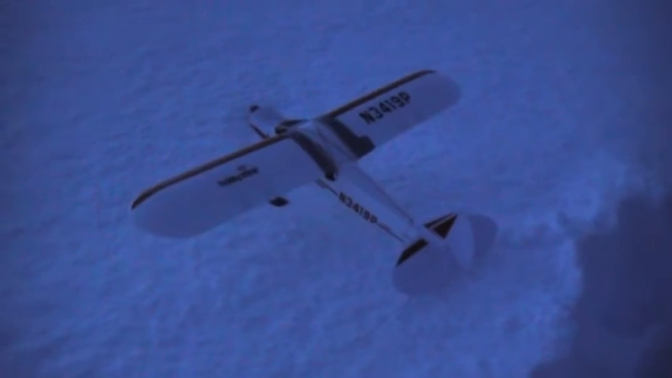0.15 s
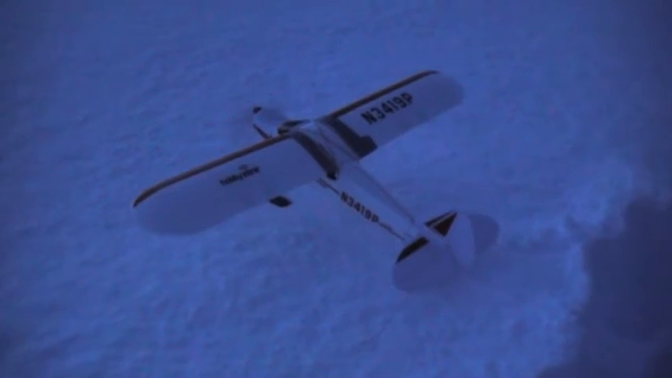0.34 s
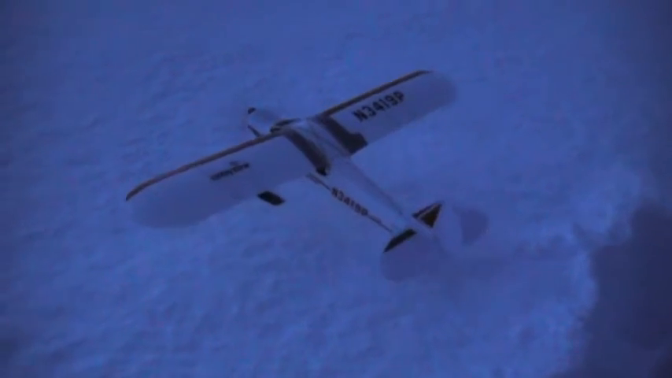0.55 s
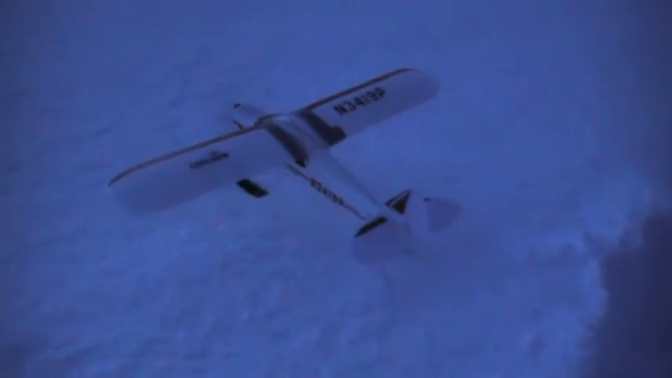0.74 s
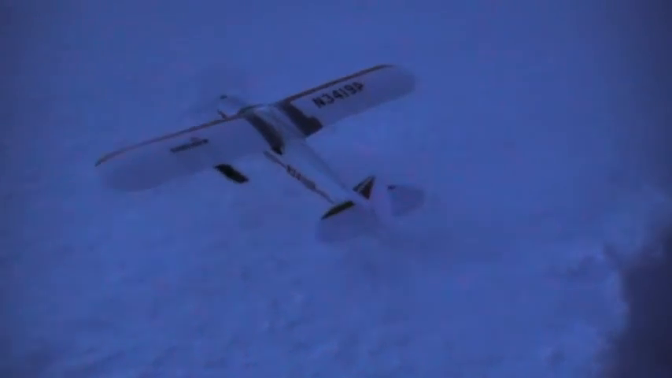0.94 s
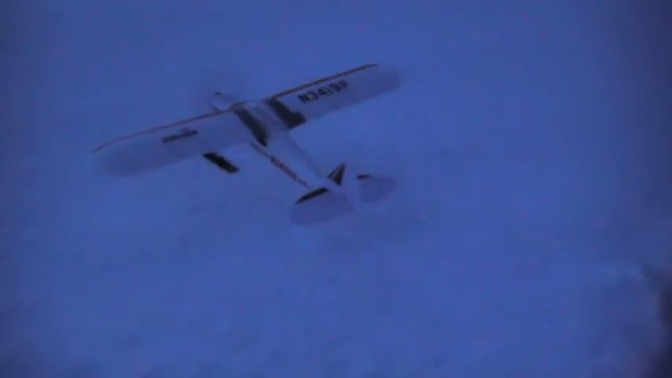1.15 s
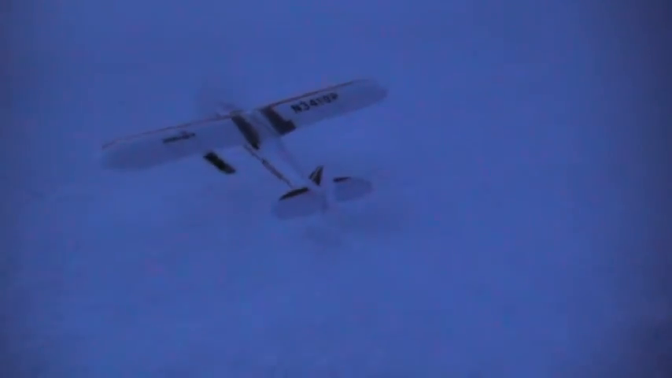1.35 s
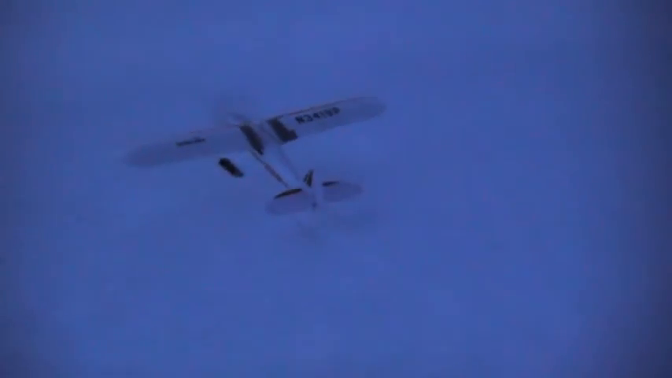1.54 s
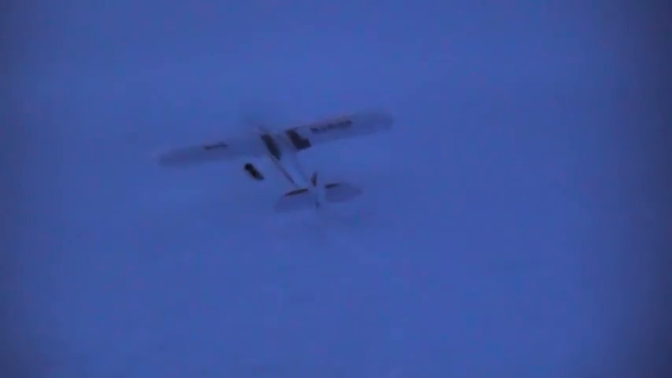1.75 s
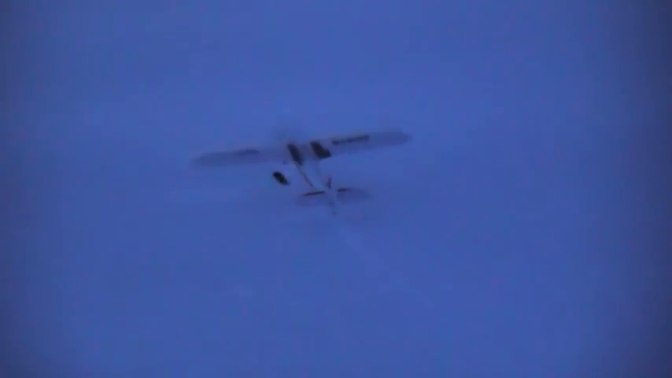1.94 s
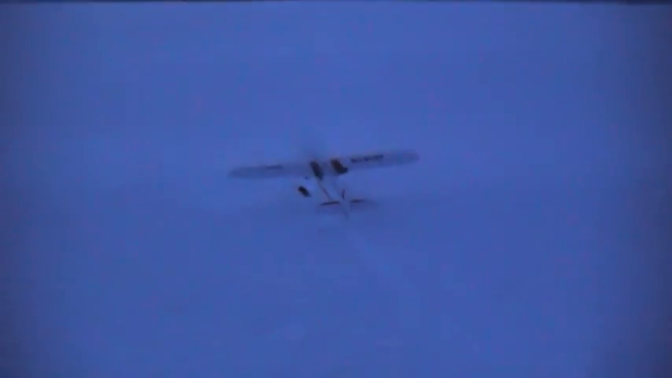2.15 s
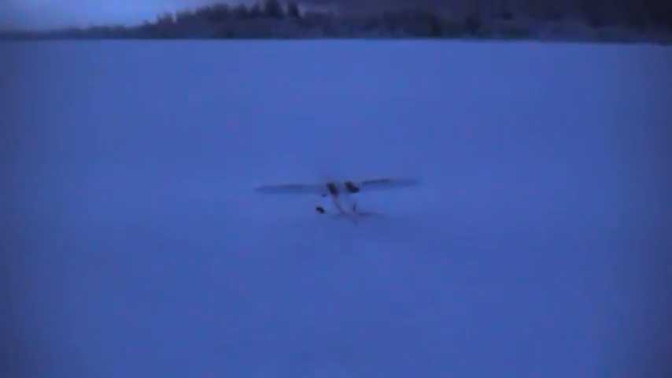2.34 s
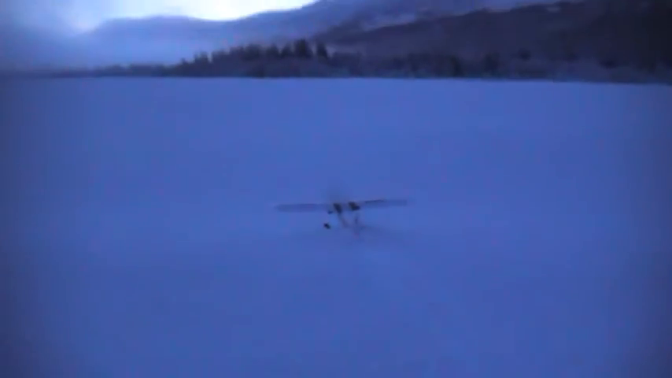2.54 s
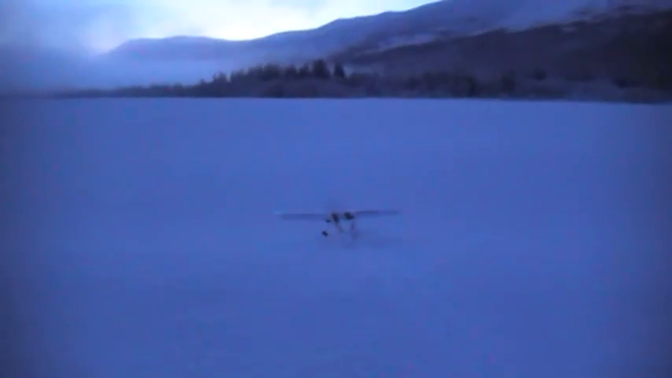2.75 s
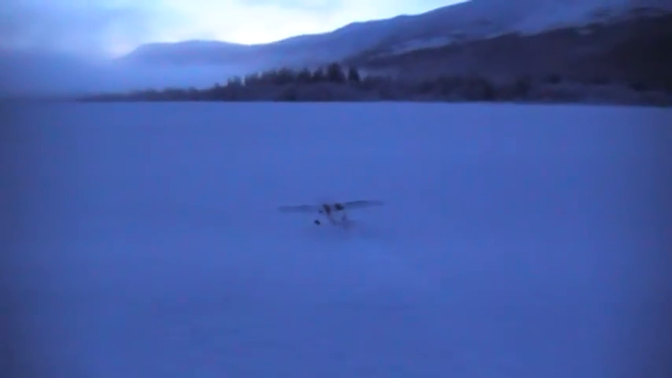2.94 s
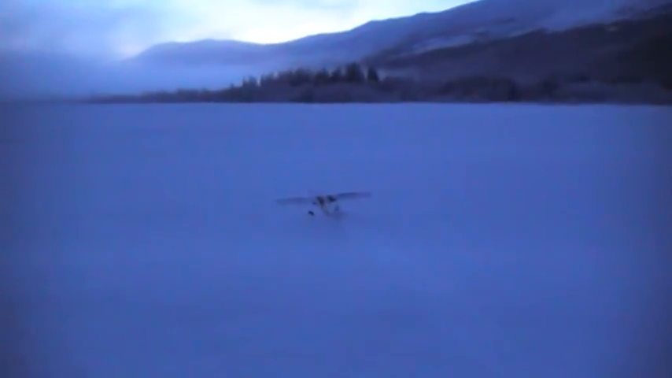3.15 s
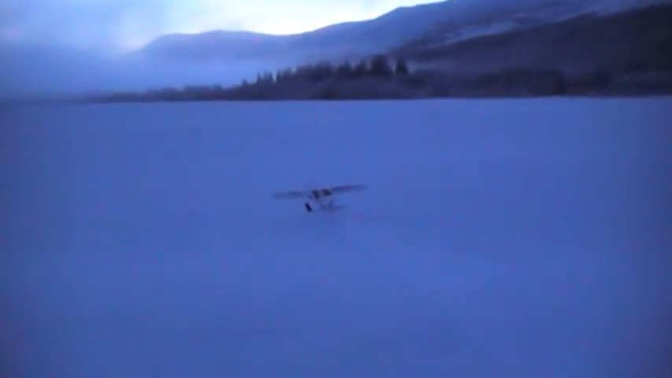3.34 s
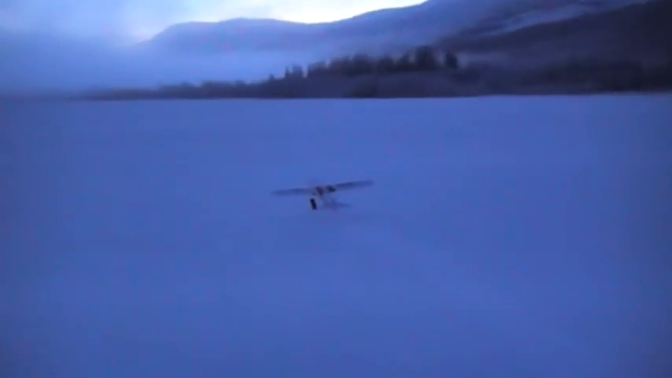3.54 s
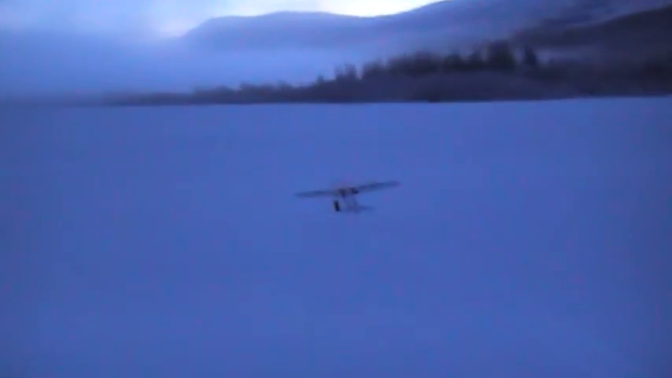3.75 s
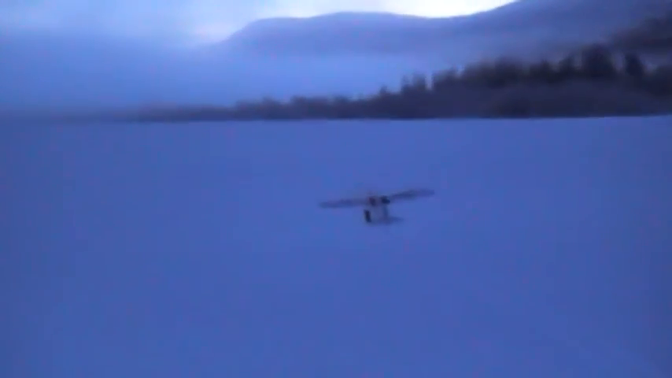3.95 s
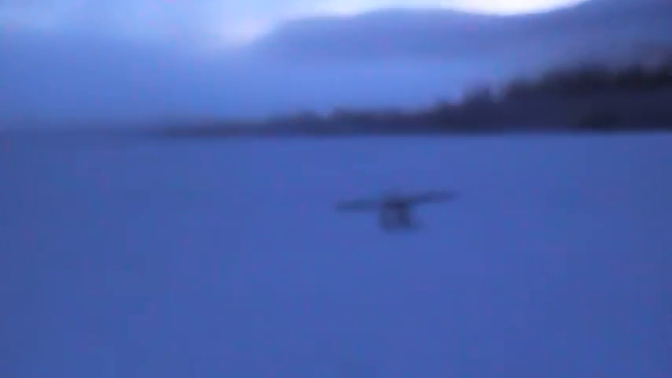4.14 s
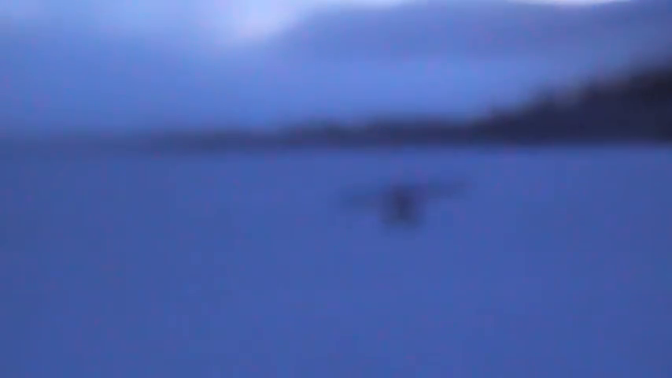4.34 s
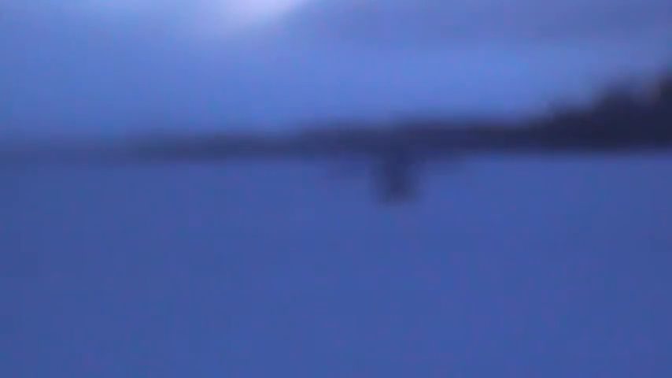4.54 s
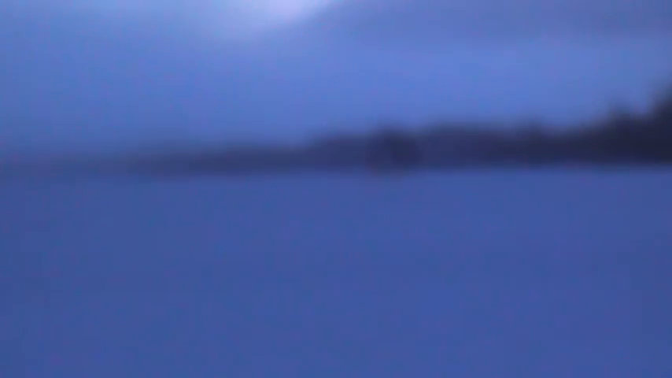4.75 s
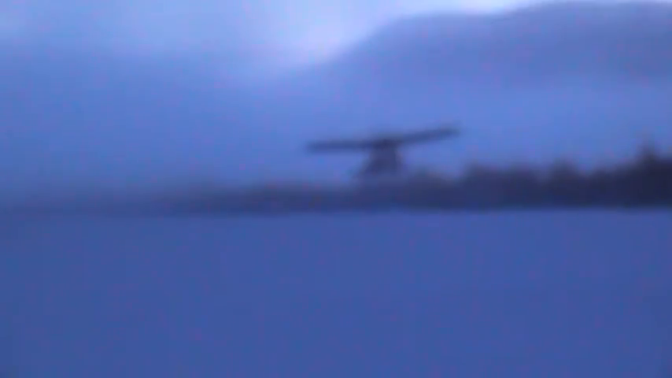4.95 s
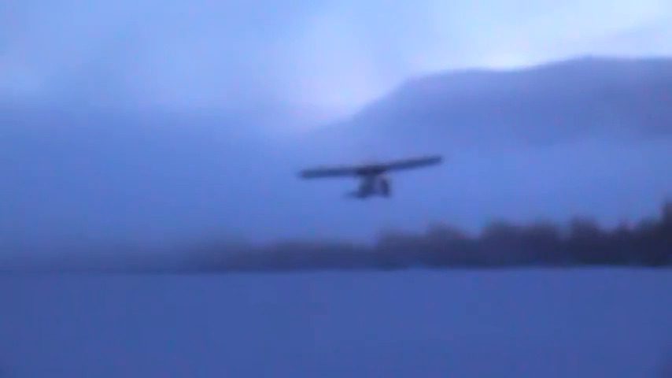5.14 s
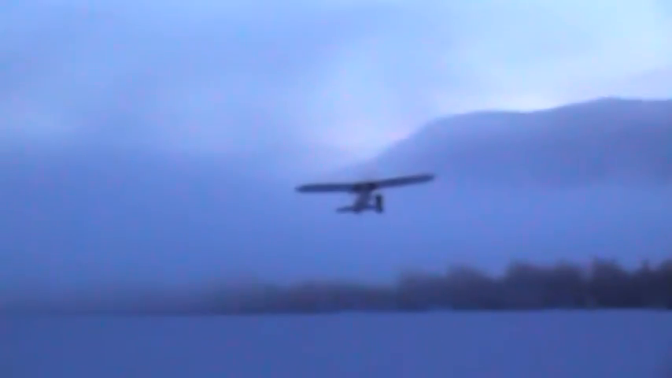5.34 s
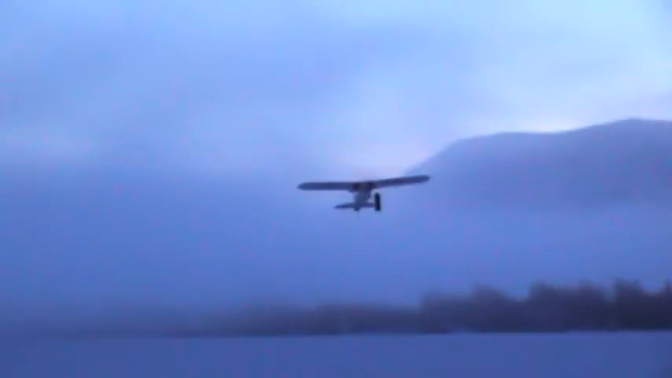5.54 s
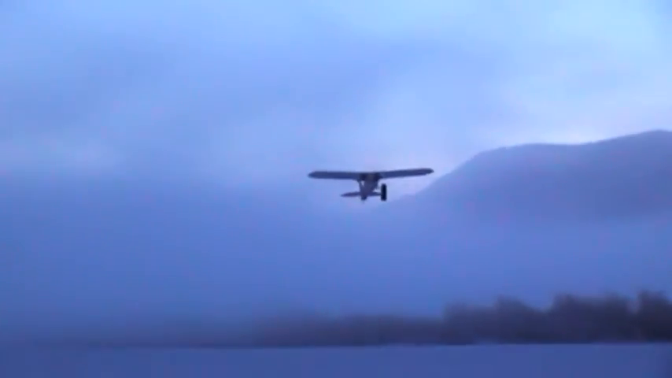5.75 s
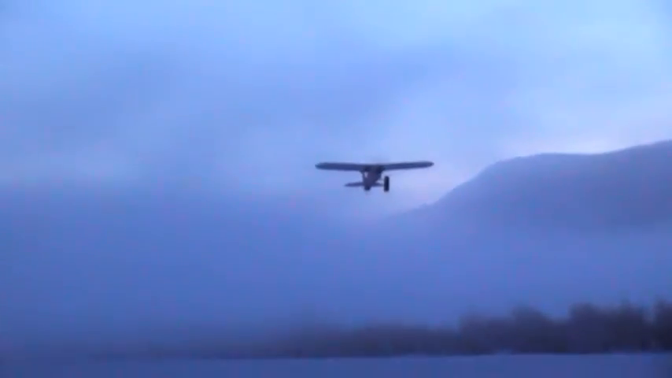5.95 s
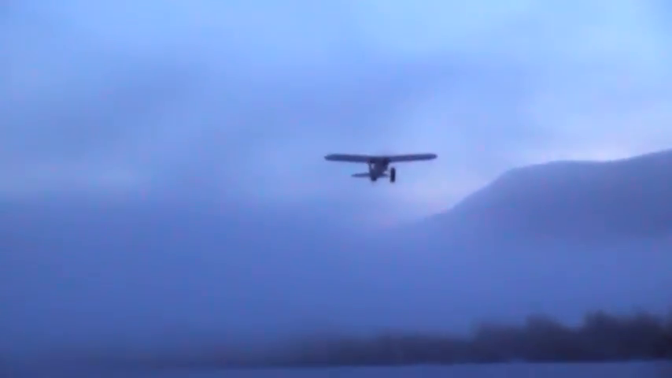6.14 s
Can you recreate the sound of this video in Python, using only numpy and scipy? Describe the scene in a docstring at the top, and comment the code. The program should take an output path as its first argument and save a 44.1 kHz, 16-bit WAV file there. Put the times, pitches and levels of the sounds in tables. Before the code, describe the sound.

A small geared electric model plane chatters and spins up close by, then buzzes and whines away over snow and lifts off, fading.

```python
"""A small geared electric model plane spins up beside the camera, its slack gear chattering and clacking.
It then slides away over snow: a 36-tooth gear whines and buzzes in a pattern that repeats every propeller
turn, built from lines locked to the shaft, over the hum and churned air of two blades.
From the middle on, a hand knocks on the camera (short noise bursts ringing its shell). The plane lifts off,
and as it climbs a delayed, inverted echo from the snow sweeps notches down through the gear sound."""
import sys
import numpy as np
from scipy import signal
from scipy.fft import rfft, irfft, next_fast_len
from scipy.io import wavfile
from scipy.ndimage import uniform_filter1d, map_coordinates

SR = 44100
rng = np.random.default_rng(int(sys.argv[2]) if len(sys.argv) > 2 else 0)


def persist_wave(psi):
    """Save psi, clipped to +-1, as 16-bit WAV."""
    counts = np.round(np.clip(psi, -1, 1) * 32767).astype(np.int16)
    wavfile.write(sys.argv[1], SR, np.atleast_2d(counts).T)


N = 277389
PADDED = next_fast_len(N + SR // 4)
TIME, FREQ = np.arange(N) / SR, np.fft.rfftfreq(PADDED, 1 / SR)


def undb(db):
    """Decibels to gain."""
    return 10 ** (np.asarray(db) / 20)


def unit(x):
    """Scale to rms 1."""
    return x / np.sqrt(np.mean(x ** 2))


def curves(table):
    """Each column of a table against its first column in seconds, joined by straight lines."""
    seconds, *columns = np.transpose(table)
    return [np.interp(TIME, seconds, column) for column in columns]


def over_freq(points):
    """Points joined on a log-frequency axis."""
    hz, value = np.transpose(points)
    return np.interp(np.log(FREQ + 1), np.log(hz + 1), value)


def filtered(x, response):
    """Apply a frequency response."""
    return irfft(rfft(x, PADDED) * response, PADDED)[..., :N]


def noise():
    """Plain white noise."""
    return rng.standard_normal(N)


def resonances(modes):
    """Response of a few damped modes, each a peak with its own width and level."""
    response = 0
    for hz, width, db in modes:
        damping = 1j * FREQ * width
        response = response + undb(db) * damping / (hz ** 2 - FREQ ** 2 + damping)
    return response


def walk(rate_hz):
    """Slow random wandering with spread 1."""
    return unit(filtered(noise(), np.exp(-(FREQ / rate_hz) ** 2)))


def ease(middle_s, spread_s):
    """A smooth step from 0 to 1."""
    return .5 + .5 * np.tanh((TIME - middle_s) / (2 * spread_s))


def tones(turns, table, waver_db):
    """Sines locked to the shaft, each free to waver a little in level."""
    total = 0
    for multiple, db in table:
        level = np.sqrt(2) * undb(db + waver_db * walk(0.91))
        total = total + level * np.sin(2 * np.pi * (round(multiple) * turns + rng.random()))
    return total


# Spectrum of still air and microphone hiss. Each row: frequency in Hz, relative density in dB per Hz.
AIR_SPECTRUM = [(25, -22), (60, -2), (200, -0.5), (500, 3.5), (1000, 5), (2500, -3.5), (5000, -5),
                (9000, 2), (15000, -36)]


def air(level_db=-52.5, side_db=-16, waver_db=0.22):
    """A faint, nearly centred hush: shaped noise with a weaker left-right difference."""
    mid, side = unit(filtered(rng.standard_normal((2, N)), undb(over_freq(AIR_SPECTRUM))))
    stereo = mid + undb(side_db) * side * np.array([[1], [-1]])
    return undb(level_db + waver_db * walk(5.8)) * stereo


# Modes of the camera shell. Each row: frequency in Hz, width in Hz, relative level in dB.
SHELL_MODES = [(306, 240, 4), (694, 340, -11), (980, 530, 8)]
# Knocks of the hand. Each row: start in seconds, peak in dB before the knock trim,
# low thud against the shell modes in dB before the thud trim.
HAND_KNOCKS = [(2.58, -18, -21), (2.594, -23.5, -17), (2.64, -25.5, -14), (2.673, -31, -8),
               (2.752, -25.5, 5), (2.782, -25.5, -15), (2.864, -28.5, -13), (2.913, -27.5, -4),
               (2.942, -24, -1), (3.238, -20.5, -2), (3.395, -36, -21), (3.959, -37, -18),
               (4.766, -42, -16), (5.824, -38, -17)]


def knocks(decay_s=.007, dull_hz=1350, thud_hz=110, thud_trim_db=10, knock_trim_db=-2):
    """Short dull bumps of a hand on the camera: decaying noise pushes ring the shell and a low thud."""
    out, soft = 0, 1 / (1 + (FREQ / dull_hz) ** 8)
    for start_s, peak_db, low_db in HAND_KNOCKS:
        age = np.maximum(TIME - start_s, 0)
        push = (age > 0) * np.exp(-age / decay_s) * noise()
        thud = (thud_hz, thud_hz, low_db + thud_trim_db)
        bump = filtered(push, soft * resonances(SHELL_MODES + [thud]))
        out = out + undb(peak_db + knock_trim_db) * bump / np.abs(bump).max()
    return out


# The motor spins up, then sags a little. Each row: time in seconds, propeller speed in turns per second.
MOTOR_SPEED = [(0, 48.3), (.1, 50.87), (.2, 52.6), (.3, 55.2), (.4, 59.55), (.5, 63.25), (.6, 65.85),
               (.7, 68.65), (.76, 69.4), (.92, 69.6), (1.5, 68.88), (2.25, 68.21), (3, 67.83), (3.5, 67.73),
               (4.5, 67.8), (4.75, 67.92), (6.29, 67.62)]


def shaft_speed():
    """Propeller turns per second."""
    return curves(MOTOR_SPEED)[0]


def spun_up():
    """Motor speed from 0 at its slowest to 1 at its fastest."""
    speed = shaft_speed()
    return (speed - speed.min()) / np.ptp(speed)


# The plane starts beside the camera and accelerates evenly away.
START_M, RELEASE_S, ACCEL_M_S2 = 1.54, 0.22, 1.66


def doublings():
    """How many times the distance to the plane has doubled."""
    along_m = .5 * ACCEL_M_S2 * np.maximum(TIME - RELEASE_S, 0) ** 2
    return np.log2(np.hypot(along_m, START_M) / START_M)


def airborne():
    """Lift-off: 0 on the snow, 1 in the air."""
    return ease(3.82, 0.27)


def climbed():
    """Climb that levels out: 0 low, 1 at full height."""
    return ease(4.6, 0.48)


def slack():
    """Play in the gear: 1 while it chatters, 0 once the load takes it up."""
    return 1 - ease(0.46, 0.084)


# The pinion binds three times a turn. Each row: place in turns, width in turns, pressure in dB.
TIGHT_SPOTS = [(0.141, 0.04, 2), (0.461, 0.038, -1.5), (0.881, 0.038, -6.5)]


def tooth_load(angle):
    """Pressure on the teeth around one turn: a small even load plus a bump at each tight spot."""
    load = 0.1
    for place, width, db in TIGHT_SPOTS:
        away = (angle - place + .5) % 1 - .5
        load = load + undb(db) * np.exp(-.5 * (away / width) ** 2)
    return load


# Modes of the foam panels. Each row: frequency in Hz, width in Hz, relative level in dB.
PANEL_MODES = [(970, 5.7, 2.5), (878, 72, -10.5), (1480, 210, -7.5), (1860, 164, -10.5), (3460, 370, -14),
               (444, 140, -16), (191, 28, -19)]


def panel_shake(turns):
    """Noise pressed by the tight spots rings the foam panels."""
    return unit(filtered(noise() * tooth_load(turns), resonances(PANEL_MODES)))


# Modes of the gearbox. Each row: frequency in Hz, width in Hz, relative level in dB.
GEARBOX_MODES = [(8170, 310, 2), (6630, 300, -3.5), (9940, 380, -7)]


def gear_clack(turns, decay_turns=0.081):
    """A burst of noise once a turn rings the gearbox."""
    burst = noise() * np.exp(-(turns % 1) / decay_turns)
    return unit(filtered(burst, resonances(GEARBOX_MODES)))


def airframe(turns, rattle_db=-24.0, loaded_rattle_db=-38, rattle_fade_db=9.5,
             clack_db=-23, clack_spin_db=14, throb_db=-40):
    """The slack gear rattles the panels, throbs three times a turn and clacks, harder as it speeds up."""
    shake, play = panel_shake(turns), slack()
    clack = undb(clack_db + clack_spin_db * spun_up()) * play * gear_clack(turns)
    throb = undb(throb_db) * tones(turns, [(len(TIGHT_SPOTS), 0)], waver_db=.5)
    loose = play * (undb(rattle_db) * shake + clack + throb)
    # a fainter rattle stays under load and fades with each doubling of distance
    return loose + undb(loaded_rattle_db - rattle_fade_db * doublings()) * shake


# Spectrum of air churned by the blades. Each row: frequency in Hz, relative density in dB per Hz.
WASH_SPECTRUM = [(40, -20), (150, -2.5), (350, -1.5), (600, -3.5), (1000, 2), (1600, -35), (4000, -28)]


def blade_wash(level_db=-42, fade_db=6.5):
    """Churned air: shaped noise that gusts at random and fades with distance."""
    wash = unit(filtered(noise(), undb(over_freq(WASH_SPECTRUM))))
    return undb(level_db - fade_db * doublings() + walk(6.3)) * wash


# Propeller tones. Each row: multiple of the turn rate, level in dB at full speed and starting distance,
# fade in dB per doubling of distance, gain in dB once airborne.
BLADE_TONES = [(1, -52, 6.5, 3), (2, -36, 8, 3), (3, -52, 7.5, 11), (4, -45, 6, 7), (6, -40.5, 10, 22.5),
               (8, -45.5, 9, 18.5), (10, -40.5, 10.5, 13), (12, -41.5, 7, 5.5), (14, -44.5, 6, -2),
               (17, -50.5, 5, 7)]


def propeller(turns, spin_db=7):
    """Two blades stress the even multiples; the tones grow with speed and open up after lift-off."""
    far, aloft, hum = doublings(), airborne(), 0
    for multiple, db, fade_db, lift_db in BLADE_TONES:
        level = undb(db - fade_db * far + lift_db * aloft)
        hum = hum + level * tones(turns, [(multiple, 0)], waver_db=0.56)
    return undb(spin_db * (spun_up() - 1)) * hum + blade_wash()


# Resonances of the nose that the whine sweeps through.
# Each row: frequency in Hz, width in Hz, relative level in dB.
NOSE_MODES = [(1844, 100, 0), (2470, 154, 1)]


def whine(turns, teeth=36, level_db=-24.0, fade_db=5.0, dip_s=1.41, dip_width_s=0.32, dip_db=-9.5):
    """Teeth meeting one after another make a clean, piercing tone, coloured by the nose."""
    tone = filtered(tones(turns, [(teeth, 0)], waver_db=1.0), resonances(NOSE_MODES))
    # the whine dips once as the plane slides off
    dip = dip_db * np.exp(-((TIME - dip_s) / dip_width_s) ** 2)
    return undb(level_db - fade_db * doublings() + dip) * tone


def chatter(loaded_db=2.0, slack_db=8, calming_db=1.5):
    """Added roughness of the gear in dB: high while slack, easing as the plane gets away."""
    return loaded_db + slack_db * slack() - calming_db * doublings()


# Uneven teeth spread sidebands. Each row: centre in multiples of the turn rate, half width in multiples,
# relative level in dB, lag in turns, unevenness over the turn (exponent on the tooth load),
# roughness in dB before the chatter is added.
SIDEBANDS = [(25.5, 9, 0.5, 0.15, 0.63, -14), (36.9, 3.5, 11, 0.7285, 1, -12), (51, 3, 2, 0.662, 0.6, -2.5),
             (62.2, 2, -2, 0.508, 0.89, -8), (73.4, 3, 10.5, 0.174, 0.65, -11),
             (107.6, 5, 11, 0.027, 0.75, -18), (144.1, 5, 12.5, 0.536, 0.56, -14.5),
             (180, 5, 6, 0.324, 0.3, -9), (213.6, 5, 5.5, 0.12, 0.77, -9.5)]


def tooth_rasp(turns, drift=0.69, swell_db=1.5, line_db=3.5, steps=1024):
    """The same worn teeth come round every turn; the pattern drifts slowly and chatters turn to turn."""
    count = int(turns[-1]) + 2
    turn_start_s = np.interp(np.arange(count), turns, TIME)
    chatter_db = np.interp(turn_start_s, TIME, chatter())
    angle, multiple = np.arange(steps) / steps, np.arange(steps // 2 + 1)
    audible = (multiple > 6) & (multiple < 300)
    lines = 0
    for centre, width, db, lag, uneven, rough_db in SIDEBANDS:
        wear = rng.standard_normal(steps)
        slow, fresh = rng.standard_normal((2, count, steps))
        slow = unit(uniform_filter1d(uniform_filter1d(slow, size=40, axis=0), size=20, axis=0))
        roughness = undb(rough_db + chatter_db)[:, None]
        contact = (wear + drift * slow + roughness * fresh) * tooth_load(angle - lag) ** uneven
        # the contact sets when in the turn the sidebands sound; their strength falls off from the centre
        timing = np.exp(1j * np.angle(rfft(contact)))
        skirt = audible / (1 + ((multiple - centre) / width) ** 2) ** 0.5
        # each group swells and fades on its own
        swell = undb(db + swell_db * np.interp(turn_start_s, TIME, walk(2.3)))
        lines = lines + timing * skirt * swell[:, None]
    # paths around the moving wing add and cancel, so small clusters of lines swell separately
    paths = uniform_filter1d(rng.standard_normal(lines.shape), size=3, axis=1)
    paths = unit(uniform_filter1d(uniform_filter1d(paths, size=30, axis=0), size=20, axis=0))
    lines = lines * undb(line_db * paths)
    around = irfft(lines).ravel() * steps / np.sqrt(2)
    # read the pattern at the pace of the shaft
    return map_coordinates(around, [turns * steps], order=3)


# Other clean gear tones: multiples of the tooth rate and strong sidebands.
# Each row: multiple of the turn rate, relative level in dB before chatter weakens it.
CLEAN_TONES = [(41, 11.5), (50, 9.5), (72, 12.5), (104, 16), (108, 16.5), (111, 5), (144, 18.5)]


def clean_tones(turns):
    """Steady gear tones that come forward as the chatter calms."""
    return undb(-chatter()) * tones(turns, CLEAN_TONES, waver_db=0.0)


def dispersed(x, ms_per_khz=1.4):
    """High bending waves cross the foam faster, which spreads each tick into a short chirp."""
    return filtered(x, np.exp(1j * np.pi * ms_per_khz * (FREQ / 10 ** 3) ** 2))


# How the fuselage radiates. Each row: frequency in Hz, relative level in dB.
FUSELAGE_RESPONSE = [(100, -24), (400, -4.5), (1100, -4.5), (1500, 1.5), (2200, -3.5), (3200, 5.5),
                     (3750, -5), (4300, 1), (4950, -4.5), (5650, -6.5), (6500, 6), (8000, 5.5), (8800, -2),
                     (15000, -5.5)]


def radiated(mesh):
    """Gear vibration crosses the foam and leaves through the fuselage, louder in some bands."""
    return filtered(dispersed(mesh), undb(over_freq(FUSELAGE_RESPONSE)))


# The plane's heading tips the buzz higher or lower. Each row: time in seconds, tilt from -1 to 1.
HEADING_TILT = [(0, -0.12), (1.1, 0.14), (1.6, 0.16), (2.35, 0.019), (2.55, -0.25), (2.95, -0.47),
                (3.15, -0.27), (3.6, 0.24), (4.2, 0.032), (6.29, -0.16)]


def heading():
    """Tilt of the heading over time."""
    return curves(HEADING_TILT)[0]


def tipped(x, buzz_hz=7300, span_hz=600):
    """Lift one flank of the buzz and lower the other as the heading changes."""
    offset = (FREQ - buzz_hz) / span_hz
    return x + heading() * filtered(x, 2 * offset * np.exp(-.5 * offset ** 2))


def register(x, low_hz, high_hz, with_bass=False):
    """One band, divided by its own short-term level to hold it steady; it can take the bass with it."""
    window = signal.windows.hann(SR // 6)
    band = filtered(x, (FREQ >= low_hz) & (FREQ < high_hz))
    coverage = signal.fftconvolve(np.ones(N), window, "same")
    power = signal.fftconvolve(band ** 2, window, "same") / coverage
    if with_bass:
        band = filtered(x, FREQ < high_hz)
    return band / np.sqrt(power)


# Level of the buzz over time: it swings while fading, with a quick ripple near 4 s as the snow echo
# adds and cancels. Each row: time in seconds, level in dB before the trim and the slack cut.
BUZZ_LEVEL = [(0.05, -19), (0.55, -15), (1.26, -17), (1.65, -21), (2.29, -17.5), (2.5, -27.5),
              (2.62, -22.5), (2.91, -20.5), (3.33, -32.5), (3.73, -27), (4.02, -34), (4.14, -30.5),
              (4.25, -34), (6.25, -46.5)]


def buzz(sound, trim_db=0.2, slack_db=-3):
    """The buzz from 5.7 to 8.8 kHz, weaker while the gear is slack."""
    level_db = curves(BUZZ_LEVEL)[0] + trim_db + slack_db * slack()
    return undb(level_db) * register(sound, 5700, 8800)


# Bands of growl, rasp, whirr and sizzle. Each row: low edge in Hz, high edge in Hz.
REGISTER_BANDS = [(900, 2200), (2200, 3700), (3700, 5700), (8800, 15800)]
# Levels of the same four. Each row: level in dB at the start, before heading and slack; fade in dB per
# doubling of distance, dB per unit of heading, change in the climb in dB, change while slack in dB.
REGISTER_LEVELS = [(-29.5, 4, 3.5, -9.5, 0.5), (-25, 3, -4, -8, -2.5), (-27, 4, -4.5, -11.5, -5),
                   (-23, 4.5, 4.5, -9.5, -4)]


def registers(sound):
    """Growl, rasp, whirr and sizzle follow distance, heading, climb and load."""
    far, tilt, climb, loose = doublings(), heading(), climbed(), slack()
    out = 0
    for index, (low_hz, high_hz) in enumerate(REGISTER_BANDS):
        db, fade_db, heading_db, climb_db, slack_db = REGISTER_LEVELS[index]
        level_db = db - fade_db * far + heading_db * tilt + climb_db * climb + slack_db * loose
        out = out + undb(level_db) * register(sound, low_hz, high_hz, with_bass=index == 0)
    return out


def gear(turns):
    """Rasping teeth and clean tones, radiated by the fuselage as a buzz and four registers."""
    sound = tipped(radiated(tooth_rasp(turns) + clean_tones(turns)))
    return buzz(sound) + registers(sound)


def over_snow(x, climb_delay_ms=1.33, share=0.72, dull_hz=3300, patchy_db=1, bumps_ms=0.026):
    """A grazing echo returns inverted, later the higher the plane; uneven snow dulls and jostles it."""
    delay_ms = climb_delay_ms * climbed() + bumps_ms * walk(5.5)
    strength = share * airborne() * undb(patchy_db * walk(0.6))
    dulled = filtered(x, 1 / np.sqrt(1 + (FREQ / dull_hz) ** 2))
    echo = map_coordinates(dulled, [(TIME - delay_ms / 10 ** 3) * SR], order=3)
    return x - strength * echo


def scene():
    """One shaft drives the rattle, the blades and the gear; the snow echoes the gear and its whine."""
    turns = np.cumsum(shaft_speed()) / SR
    background = air() + knocks()
    plane = airframe(turns) + propeller(turns) + over_snow(whine(turns) + gear(turns))
    return background + plane


# Level balance of the two microphone ports. Each row: frequency in Hz, left minus right in dB.
PORT_BALANCE = [(60, -2.0), (110, -1.6), (200, -3), (380, -3), (700, -1.8), (1290, 0), (4400, 0),
                (7300, -1.4), (9500, -5.5), (12500, 2), (15000, -1)]
# Phase between the ports. Each row: frequency in Hz, lead of the left in radians.
PORT_PHASE = [(0, 0.072), (8790, 0.0), (9130, 1.5), (9650, 0.41), (10300, 1.35), (11000, 1), (12100, 0.18),
              (12700, -0.0), (15700, 0.058)]


def record(dry, shimmer_db=-14, shimmer_hz=9000, top_hz=15900):
    """Two close ports differ in level and phase, unsteadily so in the treble; the camera cuts the top."""
    half = np.array([[.5], [-.5]])
    ports = undb(half * over_freq(PORT_BALANCE)) * np.exp(1j * half * over_freq(PORT_PHASE))
    # treble turned a quarter cycle, added to one side and taken from the other
    treble = filtered(dry, 1j * FREQ ** 4 / (FREQ ** 4 + shimmer_hz ** 4))
    heard = filtered(dry, ports) + 2 * half * undb(shimmer_db) * walk(2.5) * treble
    top_cut = signal.ellip(10, .2, 80, top_hz, fs=SR, output="sos")
    return signal.sosfilt(top_cut, heard)


dry = scene()
out = record(dry)
persist_wave(out)
```